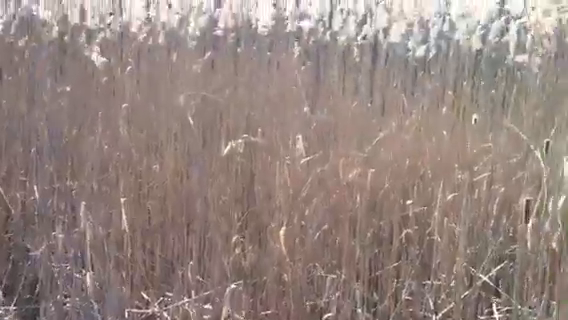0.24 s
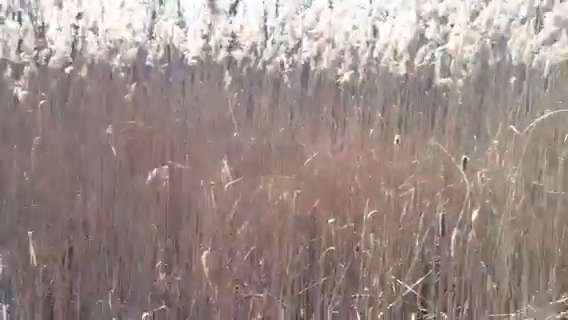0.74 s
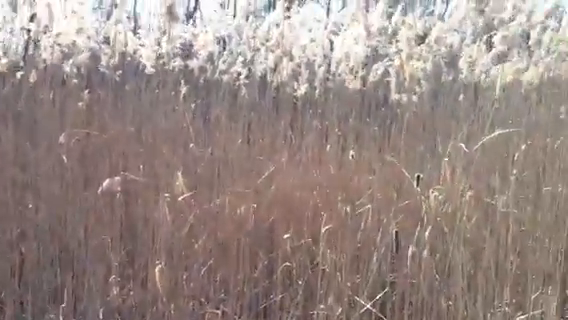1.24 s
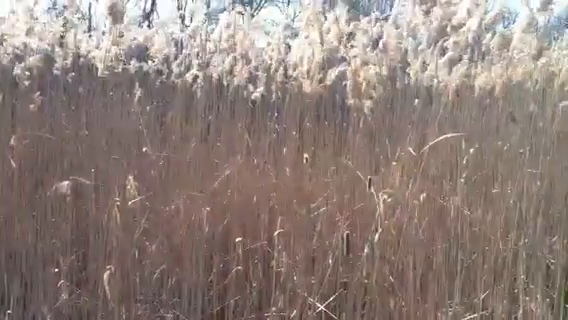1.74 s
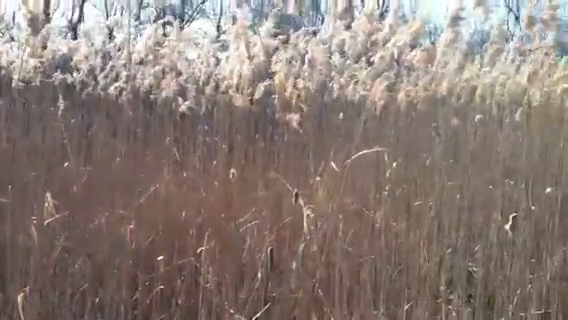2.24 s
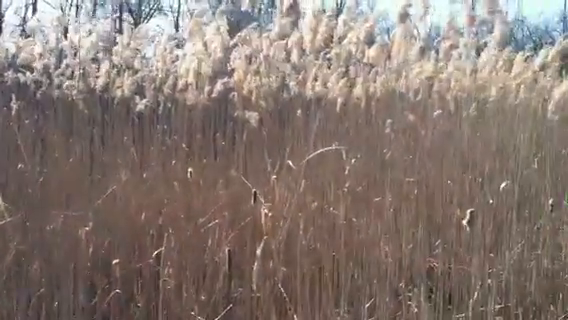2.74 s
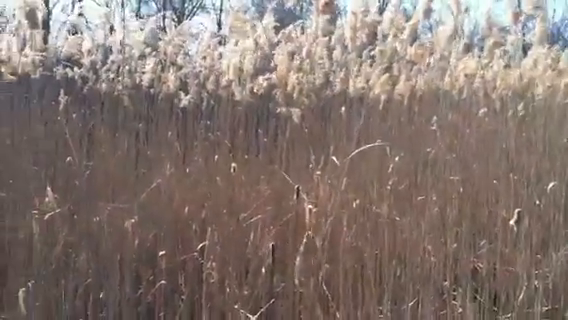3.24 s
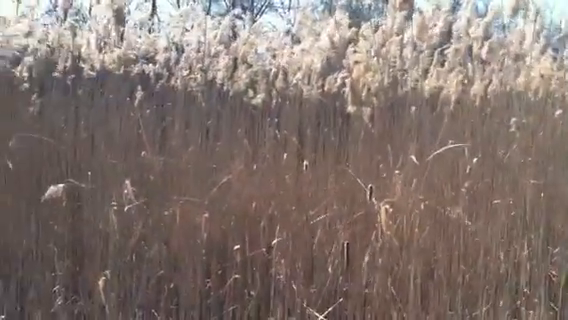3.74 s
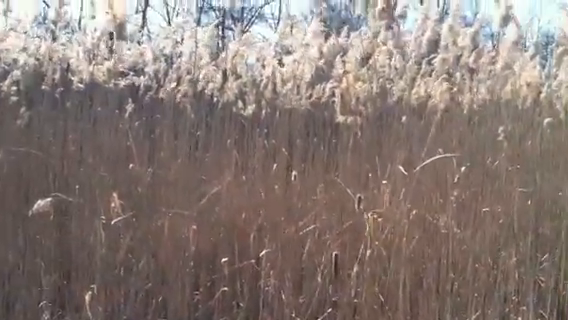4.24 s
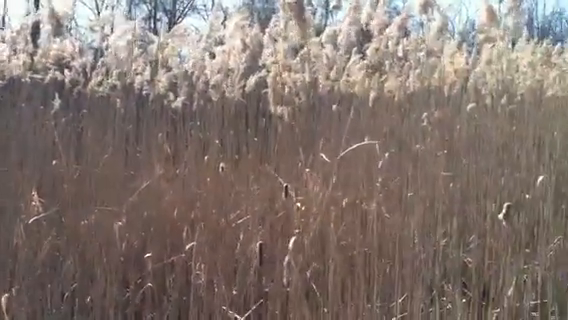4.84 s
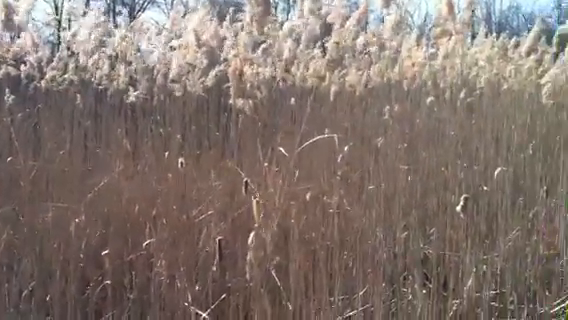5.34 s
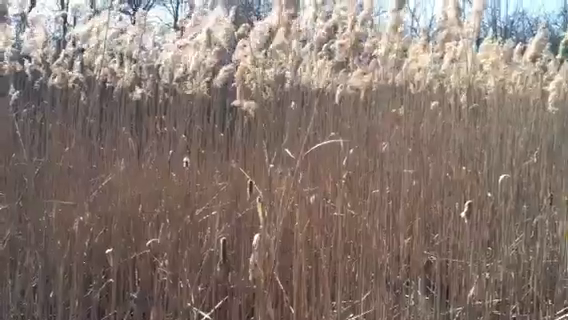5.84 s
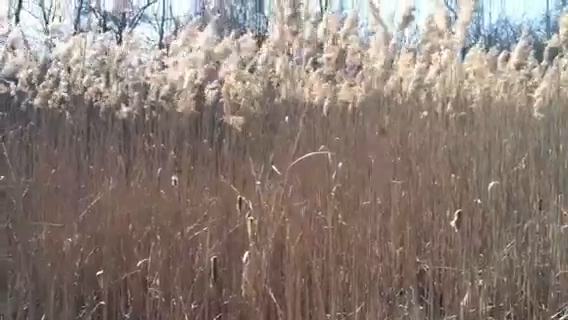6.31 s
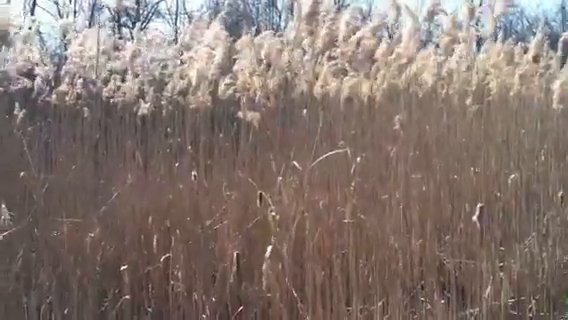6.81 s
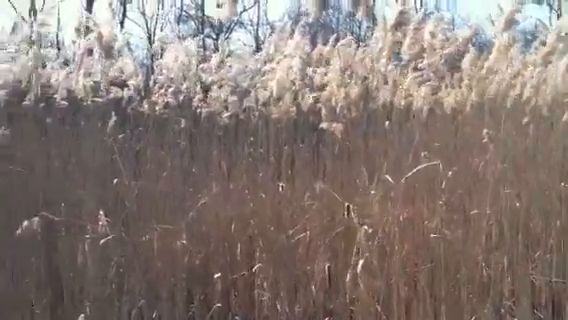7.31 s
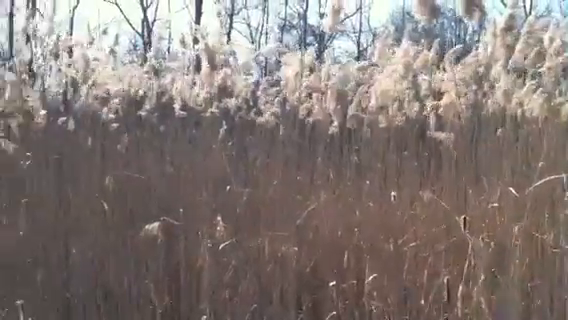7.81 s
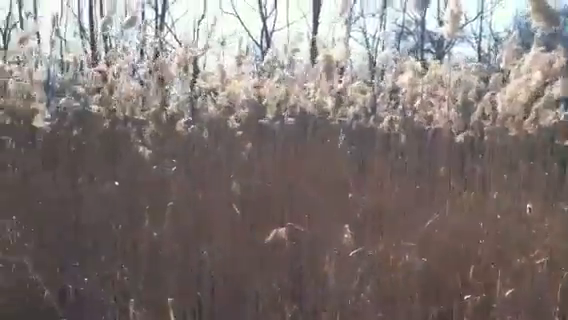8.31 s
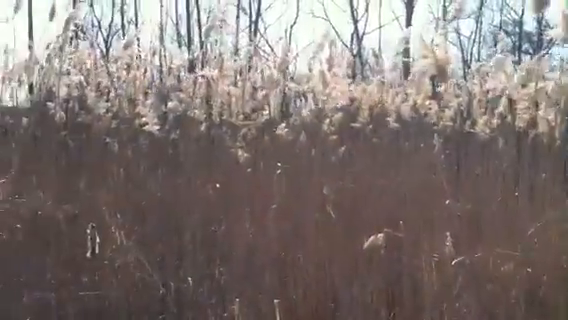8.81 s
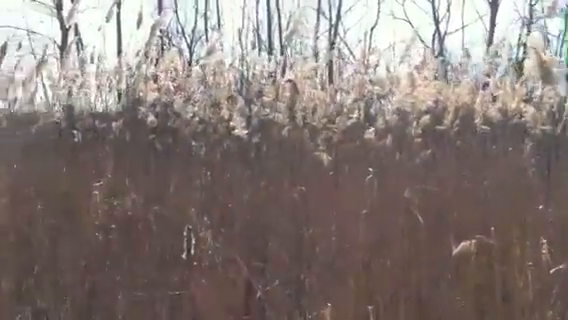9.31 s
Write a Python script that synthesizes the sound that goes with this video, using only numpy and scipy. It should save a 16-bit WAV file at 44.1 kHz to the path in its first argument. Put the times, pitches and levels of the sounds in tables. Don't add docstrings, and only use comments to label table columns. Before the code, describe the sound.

A loud, unbroken chorus of small frogs in a reedy marsh lasts about 9.5 seconds. Hundreds of distant calls blur into a shimmering high din around 3 kHz, swelling slightly. In front, nearer frogs overlap in creaky trills of about half a second, rapid short tone pulses that slow down and rise in pitch. The closest ones call around 1, 2.8, 4.5, 6.3 and 8.1 seconds, with others between. A thin bird whistle wavers at 0.6-0.9 seconds, with a tiny upward answer at 1.15. Dry reeds rustle faintly; a snap comes at 2.8, and a crackling flurry at 5-5.7. Small hollow knocks sound near 0.1, 1.2, 3.3, 3.6 and 4.1, then at 8.6 and 8.8. Soft air noise lies below, with a distant traffic hum growing from about 4 seconds. The setting is open air, with a short reedy scatter and a modest microphone dulling the extreme treble.

```python
import sys
import numpy as np
from scipy import signal
from scipy.fft import rfft, irfft
from scipy.io import wavfile
from scipy.ndimage import uniform_filter1d

SR = 44100
rng = np.random.default_rng(int(sys.argv[2]) if len(sys.argv) > 2 else 0)


def volts(x):
    e = np.asarray(x, float) / 20
    return 10 ** e


def transcribe(signal):
    frames = np.atleast_2d(signal).T
    limited = np.clip(frames, -1, 1)
    pcm = np.round(limited * 32767).astype(np.int16)
    wavfile.write(sys.argv[1], SR, pcm)


N = 421596

# frequency in Hz, level in dB per Hz.
REED = [(300, -51), (1500, -9.5), (3000, 1.5), (6000, -6), (9000, -10), (12500, -14.5), (14000, -19.5),
        (15700, -35.5)]


def in_time(rows, outside=None):
    s, *columns = np.transpose(rows)
    clock = np.arange(N) / SR
    return [np.interp(clock, s, column, outside, outside) for column in columns]


def rms_one(x):
    return x / np.sqrt(np.mean(x ** 2) + 1e-20)


def coloured(x, spectrum):
    hz, level_db = np.transpose(spectrum)
    log_hz = np.log(np.arange(N // 2 + 1) * SR / N + 1)
    return irfft(rfft(x) * volts(np.interp(log_hz, np.log(hz), level_db)), N)


def resonance(x, hz, width_hz):
    r = np.exp(-np.pi * width_hz / SR)
    ahead = [(1 - r * r) / 2, 0, (r * r - 1) / 2]
    back = [1, -2 * r * np.cos(2 * np.pi * hz / SR), r * r]
    return signal.lfilter(ahead, back, x)


def air():
    # frequency in Hz, level in dB per Hz.
    air_colour = [(20, -24), (50, -23.5), (80, -16), (130, -2), (200, -1), (400, -13.5), (560, -10.5),
                  (900, -16), (1200, -8.5), (2200, -12), (4000, -6.5), (6500, -26), (9000, -38),
                  (13000, -52)]
    return volts(-43.5) * rms_one(coloured(rng.standard_normal(N), air_colour))


def distant_traffic():
    # time in seconds, level in dB.
    swell = [(0, -64), (2, -61.5), (4.5, -57), (5.3, -57), (6, -53), (7.5, -51.5), (8.6, -50.5),
             (9.56, -51)]
    drone = resonance(resonance(rng.standard_normal(N), 265, 150), 265, 150)
    return volts(in_time(swell)[0] + 0.5) * rms_one(drone)


def pulses(s, level_db, hz, spread_db, droop, top_db, side_db):
    # multiple of the vocal cord rate, level in dB, lead in ms, rise in ms, fall in ms.
    partials = [(1, -21, 0.8, 0.98, 0.8), (2, 0.5, 0.47, 1.4, 1.15), (3, -25, 0.25, 0.9, 1.68),
                (4, -36, 0.9, 0.67, 1.83), (5, -46, .6, 0.86, 1.6), (6, -44, .3, 1.1, 1.8),
                (8, -57, .2, 1.1, 1.2)]
    sac_db_per_octave, sac_hz = 18, 3200
    steps = np.arange(-170, 330)
    ms = 1000 * steps / SR
    luck = rng.standard_normal((len(s), len(partials) + 1))
    cycle = np.pi * hz[:, None] * steps / SR * (1 - droop * ms) + 2 * np.pi * luck[:, -1:]
    stack = 0
    for k, (multiple, partial_db, lead, rise, fall) in enumerate(partials):
        order = round(multiple)
        late = ms + lead
        bell = np.exp(-(late / rise) ** 2)
        dying = 1 / np.cosh(np.clip(late / fall, 0, 30))
        shape = np.where(late < 0, bell, dying)
        own_db = partial_db + (side_db + spread_db * luck[:, k:k + 1]) * (order != 2)
        own_db = own_db + top_db * (order > 5.5)
        own_db = own_db + sac_db_per_octave * np.log2(hz[:, None] / sac_hz) * (order == 1)
        stack = stack + volts(own_db) * shape * np.sin(order * cycle)
    at = np.round(s * SR).astype(int)[:, None] + steps
    heard = (at >= 0) & (at < N)
    return np.bincount(at[heard], (volts(level_db)[:, None] * stack)[heard], N)


def trills(starts, ends, start_hz, level_db, shy_db, size):
    first_gap_s, gap_growth_s = .024, .027
    pitch_climb = 0.19
    tiring_db = 3
    along = np.linspace(0, 1, size)
    since = np.cumsum(first_gap_s + gap_growth_s * along ** 2)
    done = (since - since[0]) / (since[-1] - since[0])
    jitter = rng.standard_normal((len(ends), size, 2))
    s = starts[:, None] + done * (ends - starts)[:, None] + .0003 * jitter[..., 0]
    hz = start_hz[:, None] * (1 + pitch_climb * along ** 0.91)
    effort_db = -shy_db * (1 - along) ** 3.5 - tiring_db * along ** 6
    loud_db = level_db[:, None] + effort_db + 1.0 * jitter[..., 1]
    return s.ravel(), loud_db.ravel(), hz.ravel()


def reed_bed(x, t60, wet_db):
    t = np.arange(int(.12 * SR)) / SR
    dull = signal.lfilter([.4], [1, -.6], rng.standard_normal(len(t)))
    tail = dull * volts(-60 * t / t60) * (t > .002)
    tail = tail / np.sqrt(np.sum(tail ** 2))
    return x + volts(wet_db) * signal.fftconvolve(x, tail)[:N]


def far_group(count, t60, wet_db):
    call = np.arange(0, 8)
    tempo, start, pitch, distance = np.repeat(rng.random((count, 4)), len(call), axis=0).T
    ends = (np.tile(call, count) + start - .5) * (1.55 + .3 * tempo)
    starts = ends - .52 - .12 * tempo
    calls = trills(starts, ends, 2600 + 400 * pitch, -7.0 * distance, shy_db=18.5, size=18)
    voices = pulses(*calls, spread_db=4.0, droop=0.0015, top_db=-5.5, side_db=0.0)
    return reed_bed(voices, t60=t60, wet_db=wet_db)


def din():
    # time in seconds, level in dB.
    chorus_swell = [(0.0, -21), (0.53, -25), (1.14, -23), (1.36, -24.5), (2.8, -22.5), (3.33, -23.5),
                    (3.65, -24), (4.52, -25), (4.98, -22), (5.19, -24), (6.07, -25), (6.34, -22),
                    (6.79, -25), (7.4, -22.5), (8.71, -24), (9.56, -23.5)]
    middle = rms_one(far_group(count=12, t60=0.089, wet_db=-18))
    far = rms_one(sum(far_group(count=7, t60=0.097, wet_db=-8) for patch in range(5)))
    return volts(in_time(chorus_swell)[0]) * (volts(-7.5) * middle + volts(-1.5) * far)


def rubbing_leaves():
    # time in seconds, level in dB.
    breeze = [(0, -70.5), (2.2, -68), (4.2, -70), (5.3, -63), (6.2, -66), (7.5, -64.5), (9.0, -69.5),
              (9.56, -68)]
    # middle in seconds, level in dB, half length in seconds.
    brushes = [(0.0, -52.5, 0.012), (2.799, -58.5, 0.023), (3.29, -70.5, 0.087), (5.071, -57, 0.023),
               (5.24, -64.5, 0.015), (5.344, -60, .04), (5.609, -53, 0.039), (5.668, -60.5, 0.059),
               (6.61, -64.5, 0.026), (7.036, -67.5, .04), (7.287, -64, 0.044), (8.216, -71, 0.25)]
    sizes = volts(2.6 * np.minimum(rng.exponential(1, N), 5))
    grains = sizes * rng.choice([-1, 1], N) * (rng.random(N) < 5000 / SR)
    slow = uniform_filter1d(rng.standard_normal(N), size=700)
    flurry = rms_one(uniform_filter1d(slow, size=700))
    clock = np.arange(N) / SR
    rubbing = volts(in_time(breeze)[0])
    for s, db, half in brushes:
        rubbing = rubbing + volts(db) * np.exp(-((clock - s) / half) ** 2)
    return rubbing * volts(11.0 + 2.4 * flurry) * rms_one(coloured(grains, REED))


def hollow_knocks():
    # start in seconds, peak in dB, pitch in Hz.
    knocks = [
        (0.057, -29, 910),
        (1.162, -31.5, 866),
        (3.305, -31, 1060),
        (3.603, -37, 930),
        (4.135, -34.5, 840),
        (8.63, -37, 850),
        (8.793, -27, 867),
    ]
    out, t = np.zeros(N), np.arange(2000) / SR
    for s, peak_db, hz in knocks:
        shape = volts(peak_db - 60 * t / 0.016) * (1 - np.exp(-t / 0.00042))
        out[round(s * SR):][:2000] += shape * np.sin(2 * np.pi * hz * t)
    return out


def nearer_frogs():
    # first pulse in seconds, last pulse in seconds, first pitch in Hz, level in dB.
    nearer_calls = [(0.13, 0.687, 2573, -40), (0.536, 1.091, 3080, -29), (0.601, 1.255, 2910, -20),
                    (1.0804, 1.6706, 3020, -25.5), (1.7258, 2.2947, 2740, -19), (1.9, 2.5083, 2860, -37),
                    (2.0397, 2.662, 2590, -21.6), (2.4092, 3.099, 2940, -24.5), (2.851, 3.387, 2683, -29.5),
                    (3.478, 4.0504, 2775, -18.5), (3.531, 4.0736, 2590, -28.5), (3.854, 4.3622, 2660, -21),
                    (4.2065, 4.7345, 3010, -29), (4.1783, 4.828, 2545, -24.5), (4.4703, 5.0967, 2910, -22),
                    (4.7544, 5.32, 2650, -39), (5.3046, 5.882, 2832, -18), (6.315, 6.826, 3164, -29.5),
                    (6.8658, 7.4466, 2893, -21.6), (6.9427, 7.5242, 2620, -23),
                    (7.3066, 7.902, 2573, -32.5), (7.805, 8.3402, 3124, -30.5),
                    (8.5879, 9.229, 2860, -22.3), (8.6815, 9.2895, 2570, -23), (9.159, 9.782, 2630, -27.5)]
    calls = trills(*np.transpose(nearer_calls), shy_db=15.0, size=18)
    return volts(6.5) * pulses(*calls, spread_db=3.0, droop=0.0019, top_db=-8.5, side_db=3.0)


def snapping_stems():
    # start in seconds, peak in dB.
    stem_snaps = [(0.414, -41.5), (1.086, -39.5), (1.831, -43), (2.142, -41.5), (2.7835, -50), (2.799, -32),
                  (5.05, -40.5), (5.1293, -42.5), (5.231, -34), (5.302, -40), (5.3524, -34), (5.372, -35),
                  (5.5403, -40), (5.5693, -40), (5.64, -33), (5.672, -30), (5.6816, -34.5), (5.7025, -32),
                  (6.0397, -42), (9.111, -46)]
    snaps, t = np.zeros(N), np.arange(500) / SR
    for s, peak_db in stem_snaps:
        snaps[round(s * SR):][:500] += volts(peak_db + 7.0 - 60 * t / 0.015) * rng.standard_normal(500)
    return volts(4.5) * coloured(snaps, REED)


def single_pulses():
    # time in seconds, peak in dB, loudest partial in Hz.
    loud_pulses = [(0.5563, -8, 3110), (0.6056, -8.5, 3200), (0.656, -8, 3200), (0.676, -10, 3300),
                   (0.779, -12, 3250), (0.8441, -13.8, 3300), (1.7585, -10, 3190), (2.1241, -9.5, 3200),
                   (2.637, -10, 3200), (2.7014, -11.5, 3300), (2.7265, -11.5, 3300), (2.7404, -11, 3200),
                   (2.8663, -11, 3100), (3.017, -16, 2980), (3.0451, -16, 3000), (3.3317, -10.5, 3200),
                   (4.0038, -12.5, 3320), (4.4374, -10, 3140), (4.7357, -10, 3050), (4.8523, -14, 3150),
                   (4.9024, -13.2, 3030), (4.931, -11, 3220), (4.9611, -12.2, 3110), (5.0225, -6.5, 3180),
                   (5.5488, -17, 3160), (6.357, -17, 3160), (7.1553, -13.5, 3010), (7.8235, -11, 3300),
                   (7.9721, -11, 3240), (8.0148, -11.6, 3380)]
    s, peak_db, hz = np.transpose(loud_pulses)
    return pulses(s, peak_db, hz, spread_db=3.0, droop=0.018, top_db=-9.0, side_db=-1.0)


def bird():
    # time in seconds, pitch in Hz, level in dB.
    whistles = [
        [(.618, 6160, -52), (.68, 5950, -46), (.718, 5950, -52), (.745, 6050, -42), (.78, 6120, -56),
         (.815, 6150, -39), (.862, 6280, -37), (.89, 5950, -52), (.94, 5600, -60)],
        [(1.148, 6100, -45), (1.165, 6600, -47), (1.18, 6600, -52), (1.21, 6560, -56)],
    ]
    waver_hz, waver_per_s, octave_db = 25, 50, -43
    out = np.zeros(N)
    for rows in whistles:
        hz, level_db = in_time(rows)
        inside = in_time([(rows[0][0], 1), (rows[-1][0], 1)], outside=0)[0]
        breath = volts(level_db) * uniform_filter1d(inside, size=200)
        waver = waver_hz * rms_one(resonance(rng.standard_normal(N), waver_per_s, 40))
        phase = 2 * np.pi * np.cumsum(hz + waver) / SR
        out += np.sqrt(2) * breath * (np.sin(phase) + volts(octave_db) * np.sin(2 * phase))
    return out


def frog_in_view():
    # first pulse in seconds, last pulse in seconds, first pitch in Hz, level in dB.
    open_water = [
        (1.04, 1.6746, 2830, -21),
        (2.765, 3.3564, 2910, -21.5),
        (4.3656, 4.9815, 2670, -18),
        (6.4184, 7.0174, 2794, -18.5),
        (8.1226, 8.7184, 2840, -27),
    ]
    calls = trills(*np.transpose(open_water), shy_db=10.5, size=18)
    return pulses(*calls, spread_db=-1.0, droop=0.0067, top_db=8.5, side_db=2.0)


def nearest_frogs():
    # first pulse in seconds, last pulse in seconds, first pitch in Hz, level in dB.
    nearest_calls = [
        (1.0693, 1.617, 2766, -18),
        (2.851, 3.3776, 2770, -17),
        (4.762, 5.3026, 2810, -17),
        (6.175, 6.7635, 2796, -17.5),
        (8.0188, 8.567, 2770, -18.5),
    ]
    calls = trills(*np.transpose(nearest_calls), shy_db=8.0, size=18)
    return volts(4.5) * pulses(*calls, spread_db=1.5, droop=0.011, top_db=-6.5, side_db=3.5)


def scene():
    near = nearer_frogs() + single_pulses() + nearest_frogs()
    frogs = din() + reed_bed(near, t60=0.015, wet_db=-11)
    frogs = frogs + reed_bed(frog_in_view(), t60=0.06, wet_db=-2.5)
    reeds = rubbing_leaves() + hollow_knocks() + snapping_stems()
    whistling = reed_bed(bird(), t60=.15, wet_db=-15)
    return (frogs + whistling + reeds + air() + distant_traffic())[None]


def treble_gate(x, floor_db, waver_db):
    hz, s, bins = signal.stft(x, SR, nperseg=512)
    power = uniform_filter1d(np.abs(bins) ** 2, size=5, axis=0)
    frames = .7 * uniform_filter1d(rng.standard_normal(len(s)), size=3)
    patches = uniform_filter1d(rng.standard_normal(bins.shape), size=9, axis=0)
    patches = 3 * uniform_filter1d(patches, size=3)
    limit = volts(floor_db + waver_db * (frames + patches)) ** 2
    kept = (power > limit) | (hz[:, None] < 6500)
    return signal.istft(bins * kept, SR, nperseg=512)[1][:N]


def top_cut(x):
    return signal.sosfilt(signal.butter(12, 15700, fs=SR, output="sos"), x)


def record(dry):
    gated = treble_gate(dry[0], floor_db=-90, waver_db=7.0)[None]
    return top_cut(gated)


dry = scene()
out = record(dry)
transcribe(out)
```